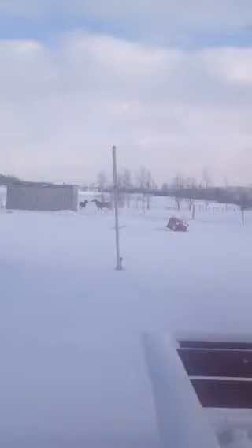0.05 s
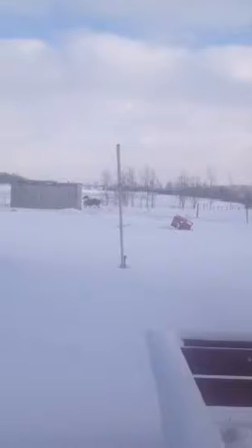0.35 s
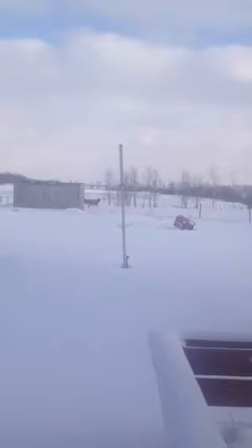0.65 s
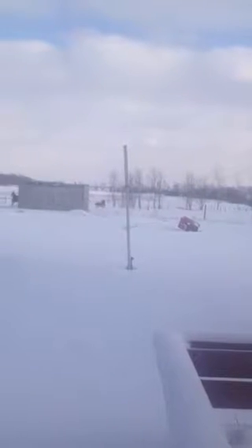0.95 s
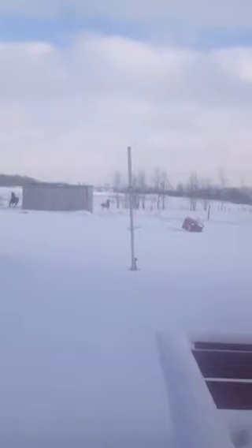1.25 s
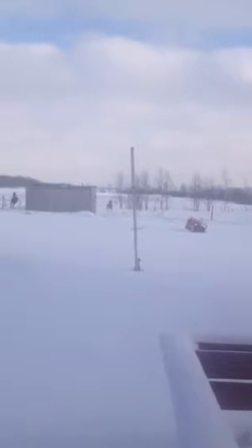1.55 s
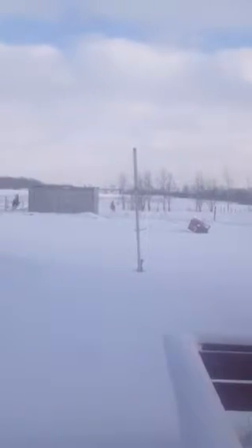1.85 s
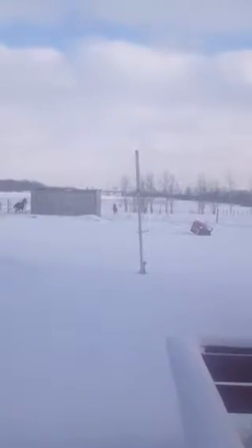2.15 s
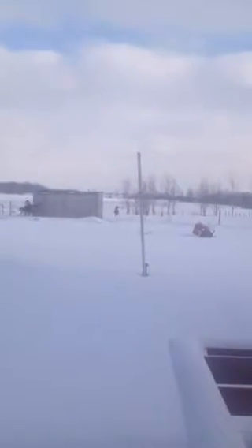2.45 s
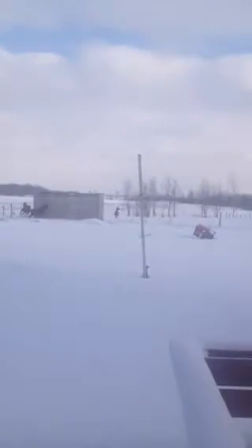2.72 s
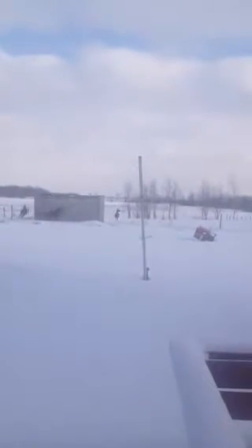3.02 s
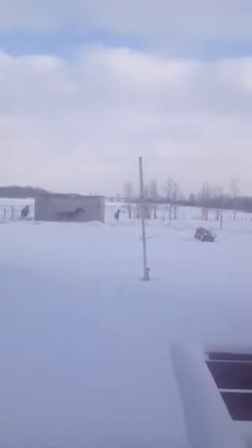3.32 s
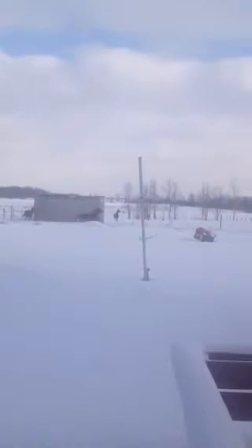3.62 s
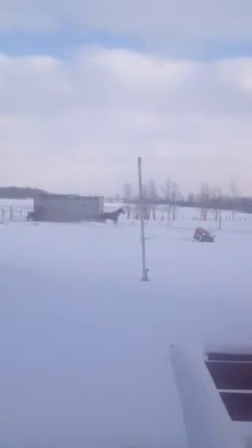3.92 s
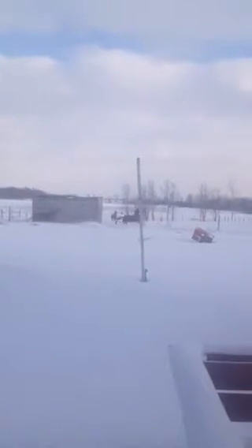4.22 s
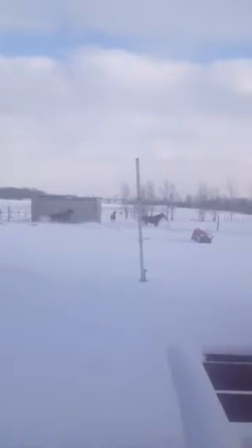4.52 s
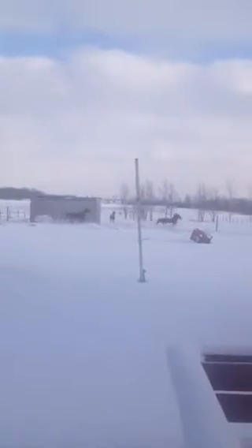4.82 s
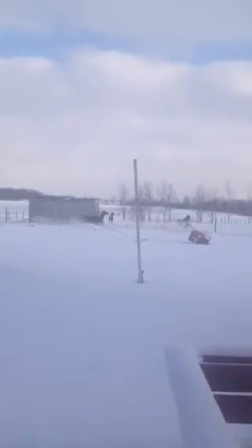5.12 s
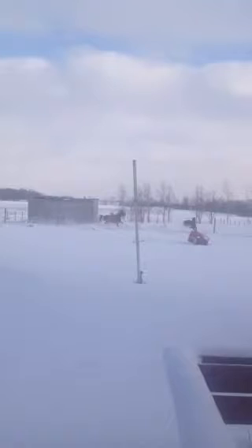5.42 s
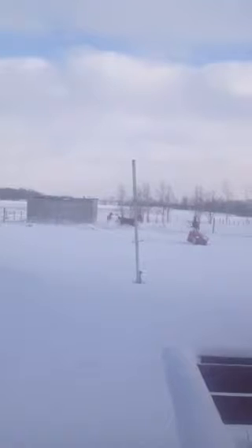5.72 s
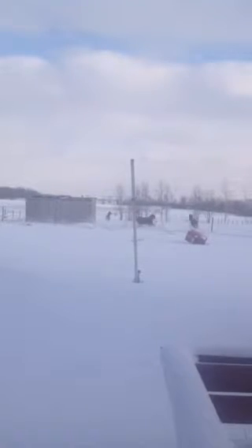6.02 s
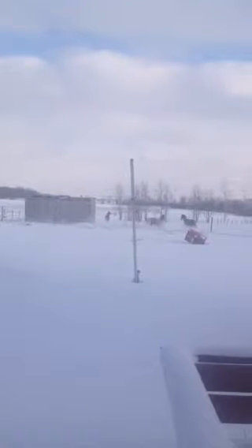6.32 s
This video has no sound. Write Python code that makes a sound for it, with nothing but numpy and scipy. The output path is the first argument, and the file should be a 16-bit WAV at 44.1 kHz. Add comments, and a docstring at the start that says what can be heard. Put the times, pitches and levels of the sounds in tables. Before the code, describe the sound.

In a small, quiet room, a faint ventilation rush and a slight electrical hum run steadily, with a few tiny handling ticks near the microphone. Near the end something gives a brief creak and scuff, then a wooden panel, perhaps a door, bumps and shuts with a sharp double clack. The room rings briefly and a sleeve rustles softly.

```python
"""A quiet small room behind a window: ventilation rush, faint mains hum and microphone hiss throughout.
Around 1 s a hollow tone swells twice in the rush; tiny handling ticks and a sleeve's brush dot the quiet.
At 5.3 s something creaks and scuffs. At 5.8 s a wooden panel, perhaps a door, bumps, and at 6 s it shuts
with a double clack. The room rings briefly after each blow, and the sleeve rustles near the microphone."""
import sys
import numpy as np
from scipy import signal
from scipy.fft import rfft, irfft, next_fast_len
from scipy.io import wavfile
from scipy.ndimage import uniform_filter1d, map_coordinates

SR = 44100
rng = np.random.default_rng(int(sys.argv[2]) if len(sys.argv) > 2 else 0)


def generate_wav(signal):
    """Clip the signal to [-1, 1] and save it as 16-bit WAV at the path in sys.argv[1]."""
    frames = np.transpose(np.atleast_2d(signal))
    scaled = np.clip(frames, -1, 1) * 32767
    pcm = np.round(scaled).astype(np.int16)
    wavfile.write(sys.argv[1], SR, pcm)


N = 280476


def amp(db):
    """Decibels to gain."""
    return 10 ** (np.asarray(db) / 20)


def unit(x):
    """Scale to rms 1."""
    return x / np.sqrt(np.mean(x ** 2) + 1e-20)


def along(points, hz):
    """Read a curve of (Hz, value) points on a log frequency axis."""
    freqs, values = np.transpose(points)
    return np.interp(np.log(hz + 1), np.log(freqs + 1), values)


def since(moment):
    """Seconds since the moment, for every sample."""
    return np.arange(N) / SR - moment


def fade(t, t60):
    """Exponential decay from t = 0, down 60 dB at t60; silent before."""
    return (t >= 0) * amp(-60 * np.abs(t) / t60)


def swell(t, half):
    """A smooth rise and fall around t = 0."""
    return np.exp(-.5 * (t / half) ** 2)


def swells(rows):
    """One envelope from rows of centre in seconds, level in dB and half length in seconds."""
    return sum(amp(db) * swell(since(centre), half) for centre, db, half in rows)


def wobble(per_s):
    """A smooth random curve with per_s knots a second."""
    return map_coordinates(rng.standard_normal(int(N * per_s / SR) + 4), [np.arange(N) * per_s / SR])


def bell(hz, centre, width):
    """Power response of one resonance, 1 at its centre."""
    return 1 / (1 + (2 * (hz - centre) / width) ** 2)


def filtered(x, response):
    """EQ x with a gain given as a function of Hz."""
    size = next_fast_len(N + 8192)
    return irfft(rfft(x, size) * response(np.fft.rfftfreq(size, 1 / SR)), size)[:N]


def noise(colour):
    """Noise of rms 1, coloured by a gain over frequency."""
    return unit(filtered(rng.standard_normal(N), colour))


# The tone of the noise bed. Each row: frequency in Hz, relative level in dB.
RUSH_EQ = [(35, -62), (60, -25), (85, -24), (107, -11.5), (141, -7.5), (178, 0.5), (214, -1), (269, 0.5),
           (390, -2.5), (514, -6), (816, -5.5), (1030, -9.5), (1490, -11), (2780, -17.5), (15000, -27.5)]
# Soft resonances in the rush. Each row: centre in Hz, width in Hz, boost in dB.
DUCT_PEAKS = [(174, 27, 2.5), (275, 40, 0), (332, 11, 2.5), (385, 29, 2), (814, 37, 2)]


def ventilation(level_db=-61, drift_db=0.4):
    """The bed: rushing air and hiss with the lows rolled off, drifting slowly in level."""
    boost_db = lambda hz: sum(db * bell(hz, centre, width) for centre, width, db in DUCT_PEAKS)
    low_cut = lambda hz: 1 / np.sqrt(1 + (125 / (hz + 40)) ** 4)
    rush = noise(lambda hz: amp(along(RUSH_EQ, hz) + boost_db(hz)) * low_cut(hz))
    return amp(level_db + drift_db * wobble(per_s=2.385)) * rush


# Tones of the mains and a fan motor. Each row: pitch in Hz, rms level in dB.
HUM_TONES = [(120, -78.5), (170, -81), (1196, -88)]


def hum(waver_db=0.7, waver_rad=.13, wavers_per_s=2.6):
    """Mains and fan motor drone as sines that waver a little in level and phase."""
    out = np.zeros(N)
    for hz, db in HUM_TONES:
        peak = np.sqrt(2) * amp(db + waver_db * wobble(wavers_per_s))
        out += peak * np.sin(2 * np.pi * hz * since(0) + waver_rad * wobble(wavers_per_s))
    return out


# Swells of the hollow tone. Each row: centre in seconds, level in dB, half length in seconds.
WHISTLE_SWELLS = [(.81, -68.5, .1), (1.19, -71, 0.054)]


def whistle():
    """A narrow band of noise comes and goes in the rush as a faint hollow tone."""
    return swells(WHISTLE_SWELLS) * noise(lambda hz: bell(hz, centre=824, width=25))


# Sleeve moves. Each row: centre in seconds, level in dB, half length in seconds.
SLEEVE_BRUSHES = [(3.05, -80, 0.16), (5.49, -72, .05), (5.723, -73, 0.1), (6.176, -61.5, 0.028),
                  (6.29, -62, 0.036), (6.345, -65.5, 0.011)]
# The tone of the cloth. Each row: frequency in Hz, relative level in dB.
CLOTH_EQ = [(300, -5), (1500, 2.5), (3000, -6), (4500, 2.5), (6500, -7), (9500, 3), (13000, -4.5),
            (15000, -10)]


def sleeve():
    """Cloth brushes near the microphone in soft swells of noise."""
    return swells(SLEEVE_BRUSHES) * noise(lambda hz: amp(along(CLOTH_EQ, hz)))


# Tiny handling ticks. Each row: start in seconds, level in dB.
HANDLING_TICKS = [(.203, -62), (1.915, -64), (2.825, -66), (5.457, -61), (6.1275, -53.5)]


def handling_ticks(t60_s=.014):
    """Light touches give thin, fast-dying bursts of treble."""
    envelope = sum(amp(db) * fade(since(start), t60_s) for start, db in HANDLING_TICKS)
    return envelope * noise(lambda hz: bell(hz, centre=11000, width=7000))


# The creak's slips. Each row: start in seconds, peak level in dB, pitch in Hz, t60 in seconds.
CREAK_SLIPS = [(5.3077, -48, 1940, 0.024), (5.3135, -55.5, 1840, .11), (5.317, -58, 2040, .11)]


def creak(roughness_rad=.9):
    """Quick slips ring near one high pitch, roughened by a jitter in phase."""
    out = np.zeros(N)
    for start, db, hz, t60 in CREAK_SLIPS:
        t = since(start)
        out += amp(db) * fade(t, t60) * np.sin(2 * np.pi * hz * t + roughness_rad * wobble(per_s=170))
    return out


def scuff(centre_s=5.355, level_db=-64, half_s=0.06):
    """One dull swell of midrange noise follows the creak."""
    rub = noise(lambda hz: bell(hz, centre=1000, width=1700) * hz / (hz + 300))
    return amp(level_db) * swell(since(centre_s), half_s) * rub


# The tone of the reverb. Each row: frequency in Hz, relative level in dB.
REVERB_EQ = [(60, -30), (120, -28), (175, -1), (400, 0), (530, -10.5), (750, 0), (1250, -2.5), (1600, -4.5),
             (2700, -8.5), (4400, -11), (6500, -15), (10000, -15), (15000, -25)]
# The length of its tail. Each row: frequency in Hz, t60 in seconds.
REVERB_DECAY = [(200, 0.36), (1000, 0.31), (4000, 0.29), (12000, 0.18)]


def reverb(t, soften, build_s=0.0032):
    """The room's reflections gather into a diffuse wash; the treble dies first."""
    wash = noise(lambda hz: amp(along(REVERB_EQ, hz)) * soften(hz))
    hz, frame_s, spectra = signal.stft(wash, SR, nperseg=256)
    age = np.maximum(frame_s + t[0], 0)
    decay = fade(age, along(REVERB_DECAY, hz)[:, None])
    tail = signal.istft(spectra * decay, SR, nperseg=256)[1][:N]
    return tail * (1 - np.exp(-np.maximum(t, 0) / build_s))


# The longer modes of panel and room. Each row: pitch in Hz, relative level in dB.
RING_MODES = [(196, -4.5), (221, -7.5), (252, -8), (290, 0), (356, -6), (377, -2.5), (413, 2), (603, -5.5),
              (681, -2.5), (723, -3), (752, -9), (838, -7), (887, -5), (1036, -5), (1066, -5), (1124, -2),
              (1222, 0.5), (1255, -2.5), (1364, -4.5), (1970, 1), (2476, -2), (2830, -3.5)]


def ring(t, soften, t60_at_1khz_s=.21, swell_cycles=1.5):
    """Modes swell over a few cycles and fade, at slightly new strengths for every blow."""
    live = (t > 0) & (t < .5)
    age, out = t[live], np.zeros(N)
    for (hz, db), (jitter_db, phase) in zip(RING_MODES, rng.standard_normal((len(RING_MODES), 2))):
        t60 = t60_at_1khz_s * (1000 / hz) ** .3  # higher modes die sooner
        envelope = fade(age, t60) * (1 - np.exp(-age * hz / swell_cycles))
        tone = np.sin(2 * np.pi * hz * age + np.pi * phase)
        out[live] += amp(db + jitter_db) * soften(hz) * envelope * tone
    return out


def snap(t, soften, centre_hz=9760, width_hz=3200, half_s=0.0013):
    """A thin, bright transient at the instant the hard edges meet."""
    return soften(centre_hz) * swell(t, half_s) * noise(lambda hz: bell(hz, centre_hz, width_hz))


# The panel's broad resonances. Each row: centre in Hz, width in Hz, relative level in dB.
PANEL_PEAKS = [(416, 45, 4), (780, 80, 2), (1210, 87, 3), (1720, 45, -1), (1986, 50, 0.5), (2500, 55, -6),
               (2840, 105, -3), (3350, 70, -5), (4410, 210, -5)]
# The overall tone of the clack. Each row: frequency in Hz, relative level in dB.
CLACK_EQ = [(30, -26), (80, -34), (170, -7), (400, -10.5), (560, -12), (1200, -3.5), (2900, 0.5),
            (4300, -3), (5500, -7.5), (7200, -15.5), (9800, -13), (12000, -13), (15000, -24)]


def clack(t, soften, attack_s, contact_hz, t60_s=0.047, contact_db=7, floor_power=0.081):
    """The contact builds over milliseconds and rattles the panel; the struck place favours one band."""
    peaks = lambda hz: sum(amp(db) ** 2 * bell(hz, centre, width) for centre, width, db in PANEL_PEAKS)
    wood = lambda hz: amp(along(CLACK_EQ, hz)) * np.sqrt(floor_power + peaks(hz))
    contact = lambda hz: soften(hz) * amp(contact_db * bell(hz, contact_hz, .25 * contact_hz))
    ramp = 1 + t / attack_s
    envelope = np.where(t < 0, np.clip(ramp, 0, 1), fade(t, t60_s))
    # flatten the burst's spectrum, so that wood and contact set the colour
    spectrum = rfft(envelope * rng.standard_normal(N))
    smoothed = unit(np.sqrt(uniform_filter1d(np.abs(spectrum) ** 2, size=1200)))
    flat_burst = irfft(spectrum / smoothed, N)
    rattle = filtered(flat_burst, lambda hz: unit(wood(hz) * contact(hz)))
    return rattle * np.clip(2 * ramp, 0, 1)  # gated: silent before the attack


# The two contacts of the bump, then the double clack. Each row: hardest contact in seconds, level in dB,
# attack in seconds, low-pass corner in Hz, contact pitch in Hz, reverb in dB relative to the blow.
PANEL_BLOWS = [(5.7859, -40, .004, 5240, 1950, -3.5), (5.830, -47, .02, 330, 255, -7.5),
               (5.9590, -25.5, .0044, 7100, 1220, -11.5), (6.0016, -18, .0086, 17000, 413, -9.5)]


def panel_shutting(snap_db=-8, ring_db=-15):
    """Each blow layers a clack, a snap, a ring and reverb; softer contact dulls all four."""
    out = np.zeros(N)
    for moment, db, attack_s, corner_hz, contact_hz, reverb_db in PANEL_BLOWS:
        t = since(moment)
        soften = lambda hz: 1 / (1 + (hz / corner_hz) ** 2)
        hit = clack(t, soften, attack_s, contact_hz) + amp(snap_db) * snap(t, soften)
        tail = amp(ring_db) * ring(t, soften) + amp(reverb_db) * reverb(t, soften)
        out += amp(db) * (hit + tail)
    return out


def scene():
    """The mono mix: room tone, the panel and the small sounds around it."""
    room_tone = ventilation() + hum() + whistle()
    return (room_tone + panel_shutting() + creak() + scuff() + sleeve() + handling_ticks())[None]


def record(dry, top_hz=15400):
    """A brick-wall low-pass takes off the very top."""
    return filtered(dry[0], lambda hz: hz < top_hz)[None]


dry = scene()
out = record(dry)
generate_wav(out)
```